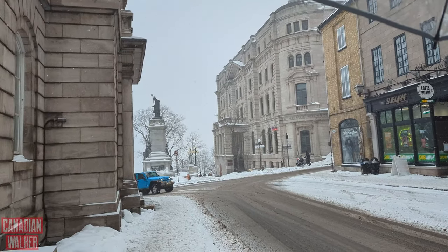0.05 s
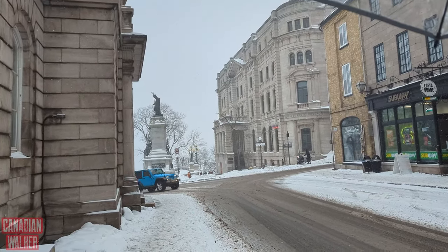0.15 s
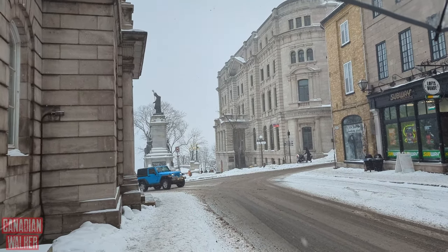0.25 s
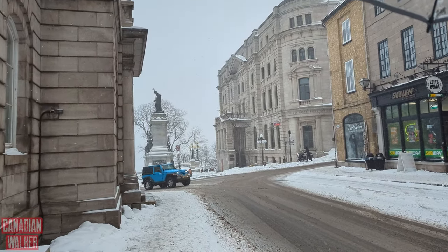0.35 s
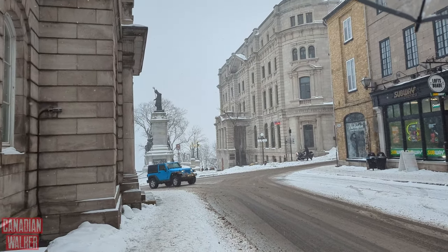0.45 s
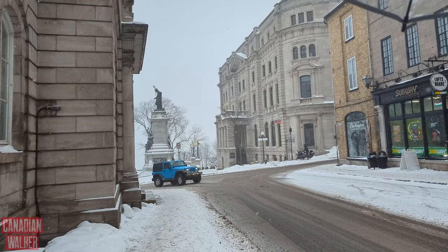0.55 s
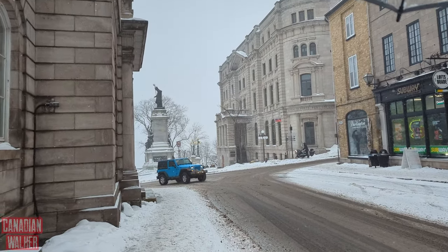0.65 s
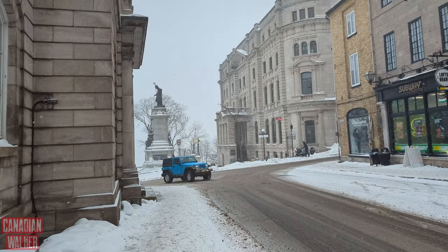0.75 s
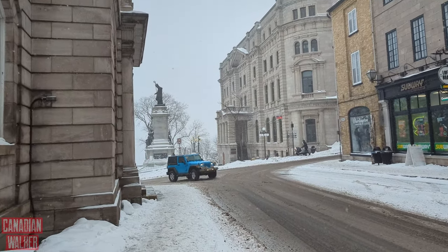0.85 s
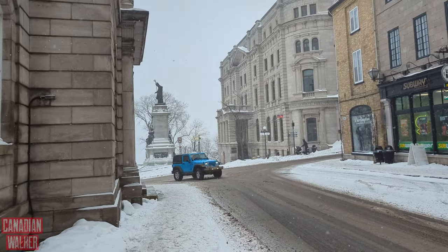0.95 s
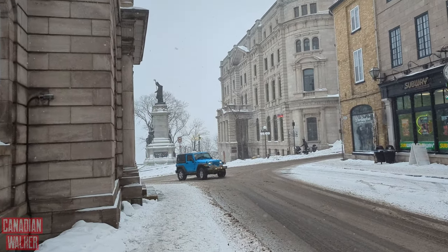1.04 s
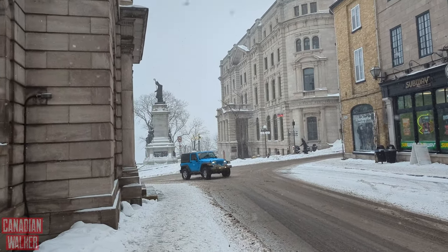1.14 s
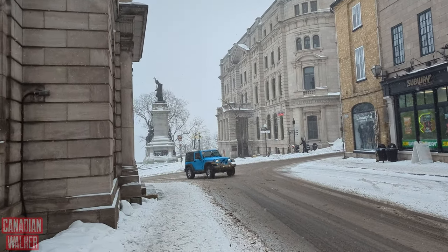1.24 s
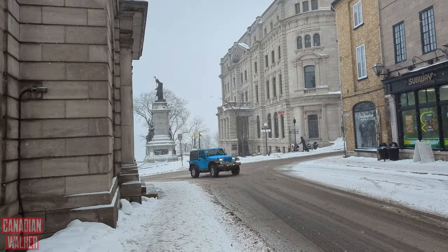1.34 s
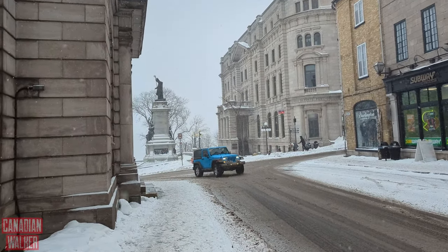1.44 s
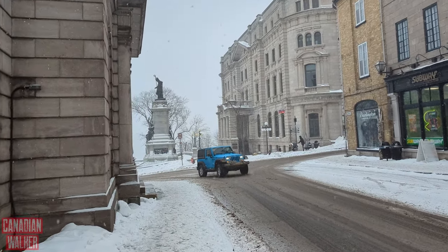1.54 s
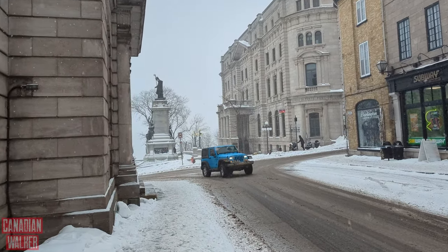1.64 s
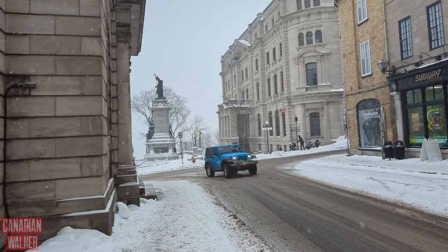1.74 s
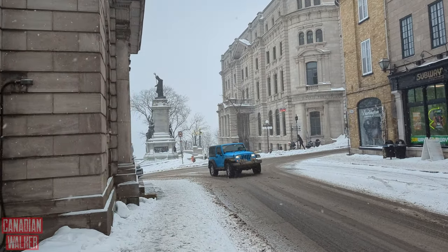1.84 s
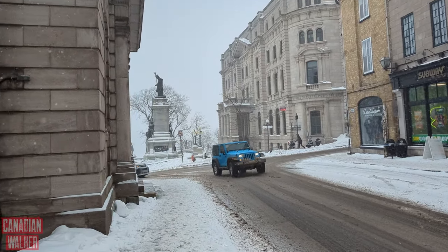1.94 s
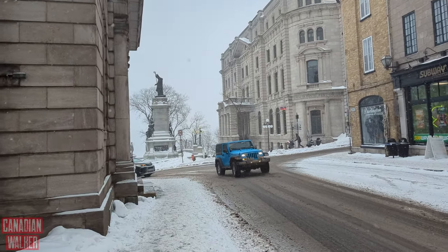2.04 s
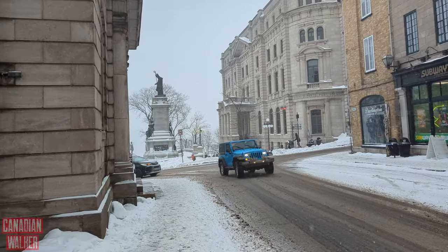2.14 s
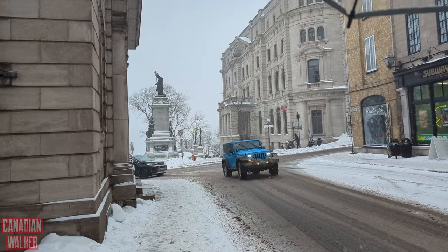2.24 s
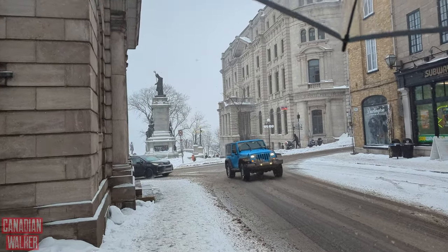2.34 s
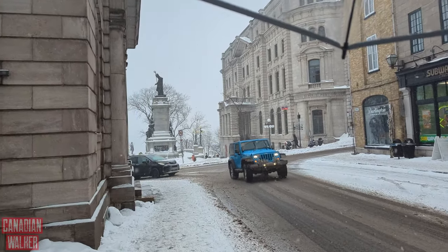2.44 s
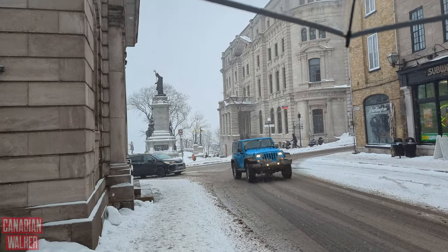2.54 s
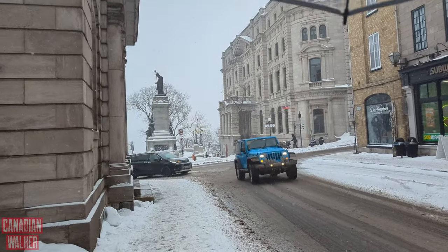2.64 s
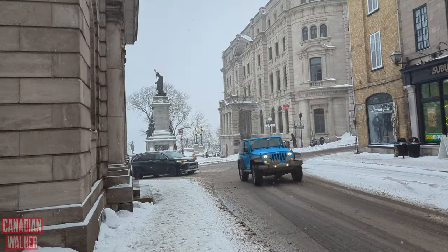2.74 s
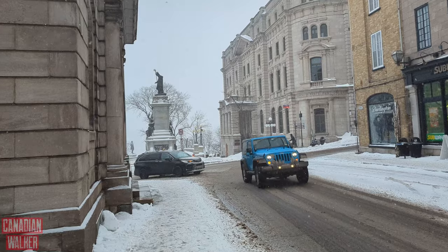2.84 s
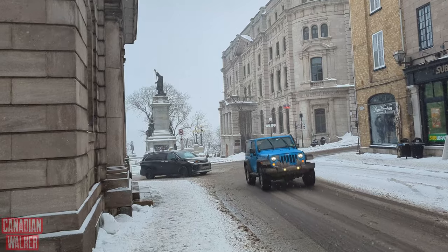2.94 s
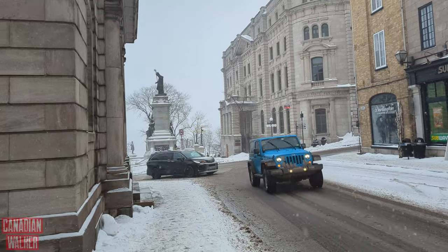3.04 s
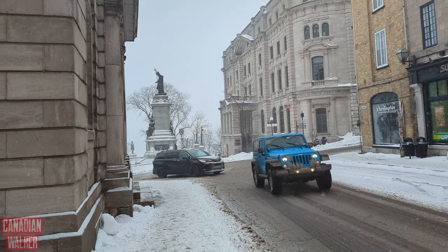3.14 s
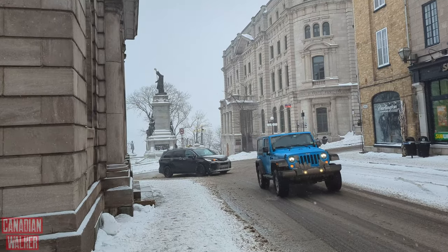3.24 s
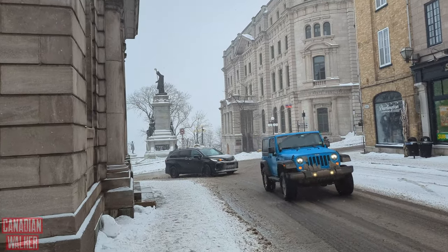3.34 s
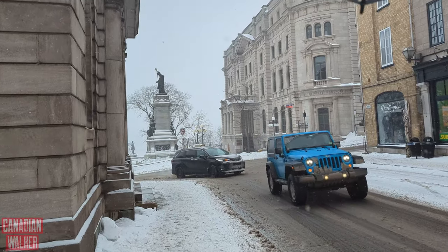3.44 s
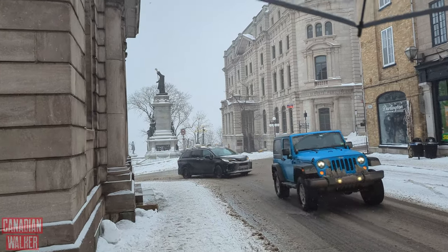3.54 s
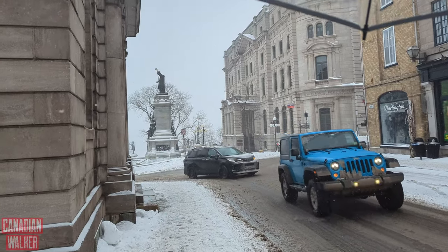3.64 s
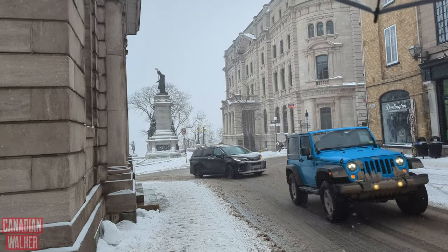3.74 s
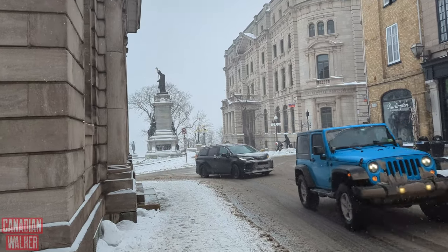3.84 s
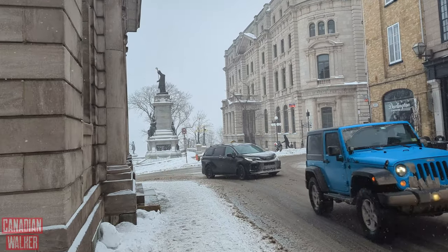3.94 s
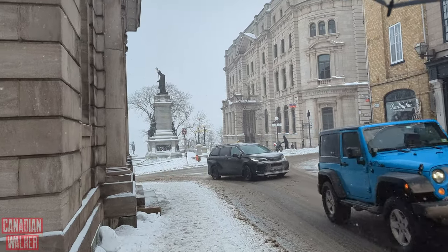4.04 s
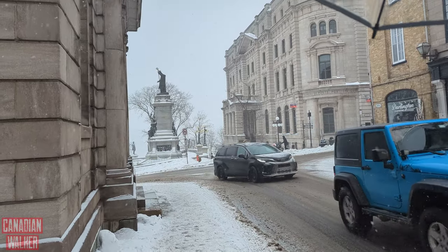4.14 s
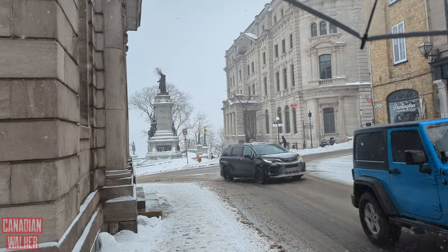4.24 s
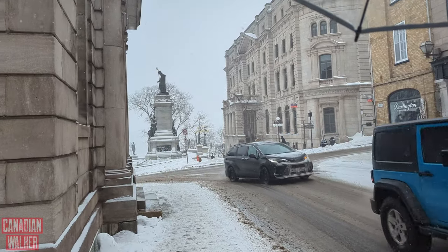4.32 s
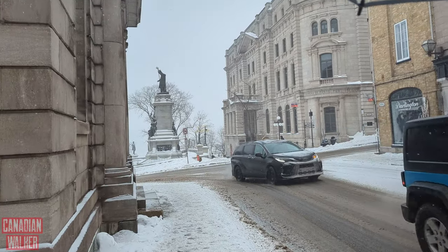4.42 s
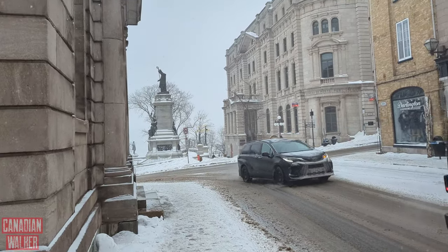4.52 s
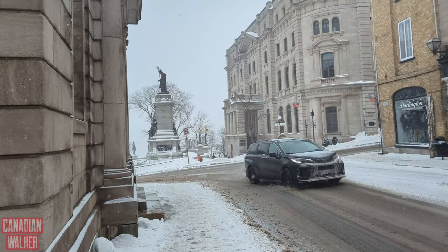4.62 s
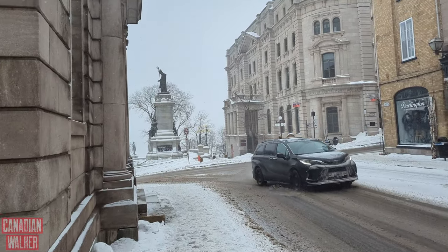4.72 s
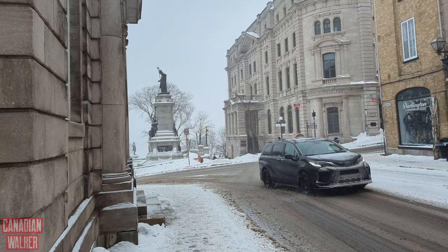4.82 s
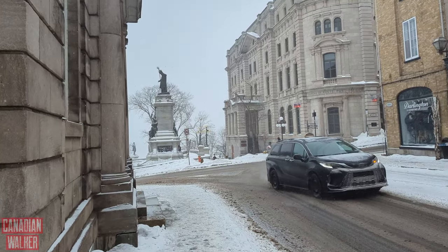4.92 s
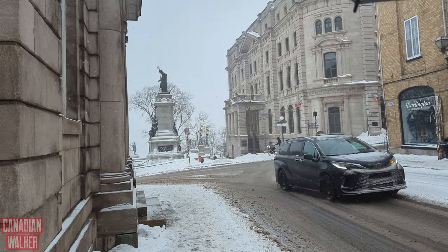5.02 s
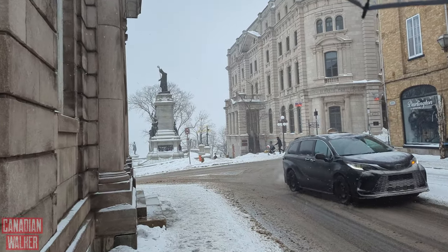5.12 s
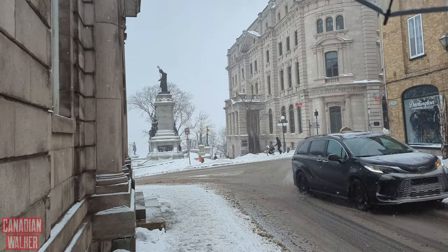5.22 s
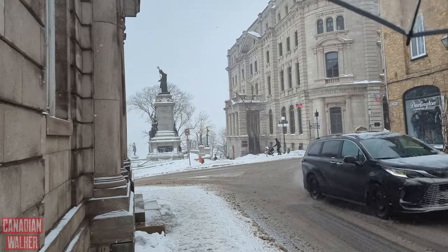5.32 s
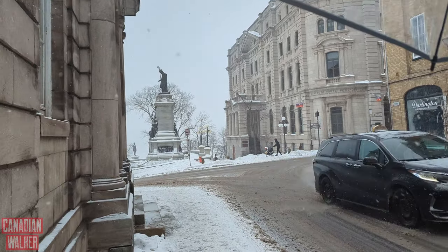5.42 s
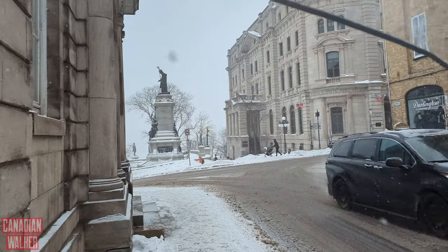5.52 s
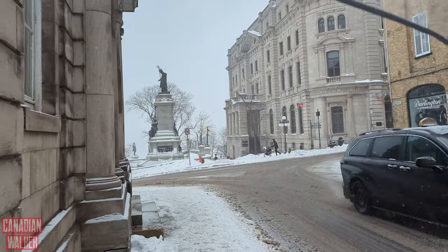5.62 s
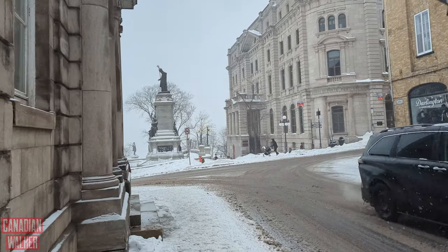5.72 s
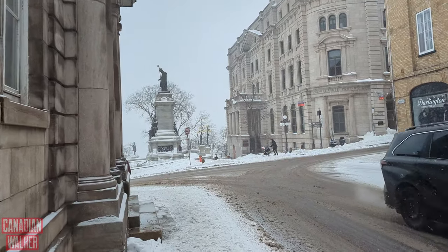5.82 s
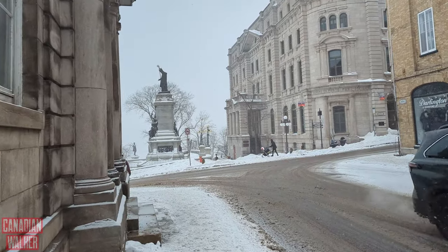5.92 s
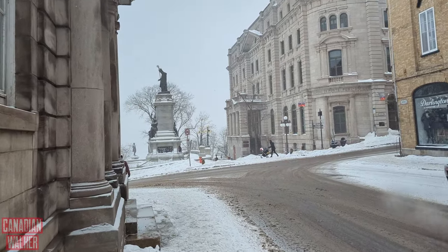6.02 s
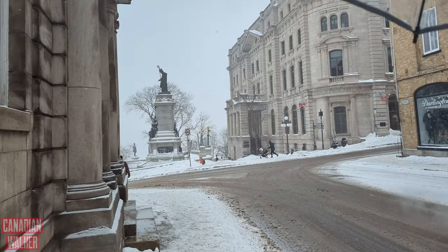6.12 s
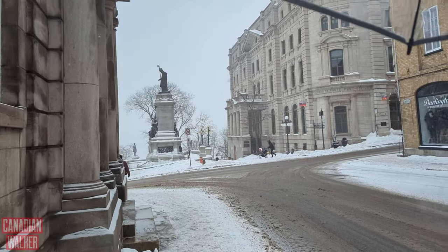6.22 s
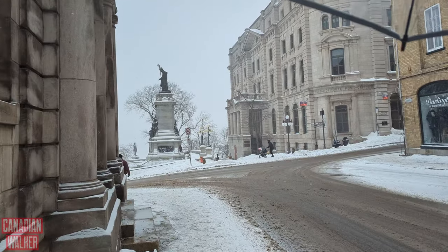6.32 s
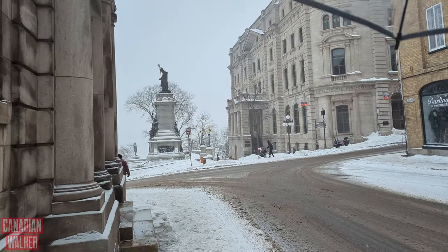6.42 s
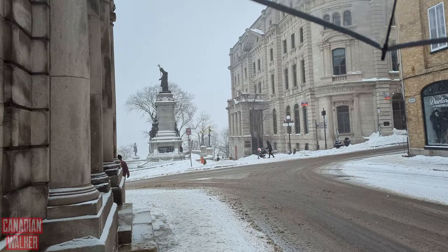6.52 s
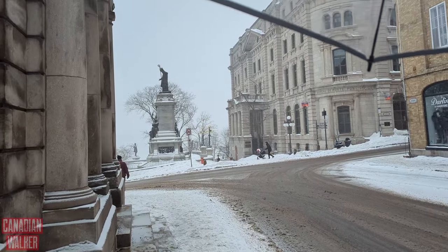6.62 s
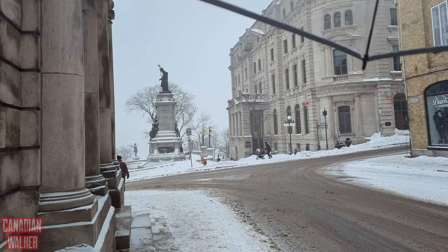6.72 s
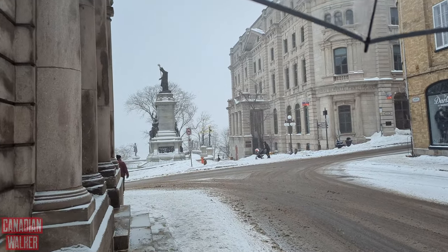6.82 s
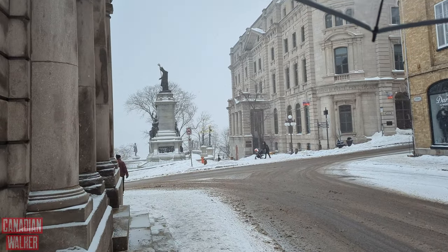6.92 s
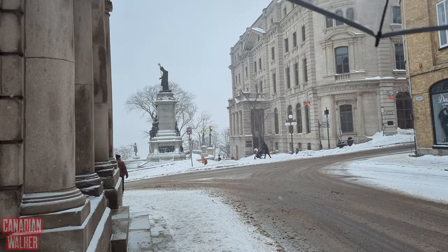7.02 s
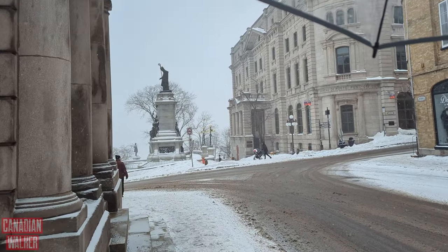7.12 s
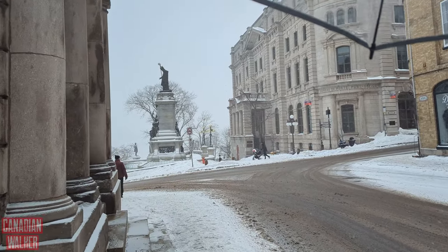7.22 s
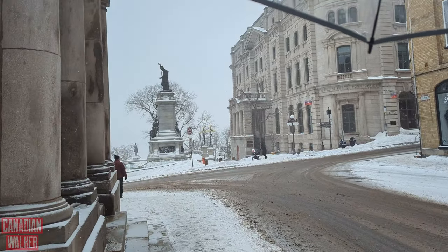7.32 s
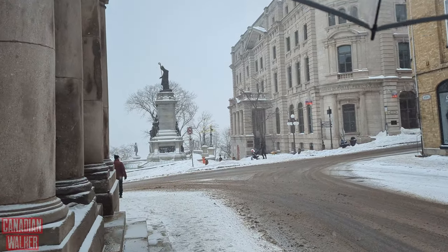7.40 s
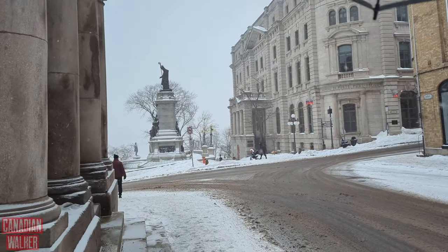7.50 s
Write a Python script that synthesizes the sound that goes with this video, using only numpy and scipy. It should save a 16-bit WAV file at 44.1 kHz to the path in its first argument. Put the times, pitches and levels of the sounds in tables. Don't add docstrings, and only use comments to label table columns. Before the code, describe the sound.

Two cars pass close on a slushy winter street, tyre roar and wet spray swelling then fading, with low wind thumps on the microphone.

```python
import sys
import numpy as np
from scipy import signal
from scipy.fft import rfft, irfft
from scipy.io import wavfile
from scipy.ndimage import uniform_filter1d

SR = 44100
rng = np.random.default_rng(int(sys.argv[2]) if len(sys.argv) > 2 else 0)


def store_wav(level_fs):
    pcm = np.round(np.clip(np.atleast_2d(level_fs), -1, 1) * 32767)
    wavfile.write(sys.argv[1], SR, pcm.T.astype(np.int16))


def field_ratio(decibels):
    return 10 ** (np.asarray(decibels, dtype=float) / 20)


N = 333396
SIZE, HOP = 1024, 256

# (low [Hz], high [Hz])
LAYERS = [
    (550, 1200),
    (1300, 3500),
    (4000, 8500),
    (9000, 15500),
]
# (time [s], left port delay [samples], treble left-right [dB], direct [0-1], wall echo [0-1])
BEARING = [(0, -4, 1, .7, .5), (.9, -3, 1, .8, .3), (1.3, -1, 0, 1, .15), (2.4, 1, 0, 1, .1),
           (3.3, 4, 0, .9, .3), (4, 7, -1, .9, .5), (4.5, 12, -3, .6, .6), (4.85, 19, -2, .6, .2),
           (5.15, 20, -1, .7, .1), (5.25, 4, 1.5, .6, .1), (5.8, 11, -1, .9, .1), (6.1, 18, -2.5, 1, .4),
           (6.5, 21, -2, 1, .4), (6.85, 20, 1, .6, .1), (7.56, 16, 2.5, .4, .1)]
# (frequency [Hz], likeness [0-1])
LIKENESS = [(500, .25), (900, .5), (1300, .6), (2200, .55), (3500, .55), (4500, .25), (9000, .2),
            (15000, .1)]
# (frequency [Hz], level [dB per Hz])
LEFT_PORT = [(330, -44.5), (520, -24.5), (800, -14), (1050, -3.5), (1450, 2), (2600, 1.5), (3900, -2),
             (5200, -6.5), (6500, -7.5), (8500, -6.5), (9900, -11.5), (12500, -9), (14800, -7.5),
             (15700, -10)]
RIGHT_PORT = [(330, -36.5), (520, -24), (800, -14.5), (1050, -4), (1450, 1.5), (3200, 3), (4000, -6),
              (5600, -4), (6400, -6.5), (8900, 0.5), (9900, -1.5), (10900, 2), (12300, -7.5), (15500, -11)]
# (frequency [Hz], phase [rad])
BODY_TWIST = [(700, 0), (1400, -.35), (2400, 0), (3500, .6), (5000, 0)]
WALL_LAG = -21.5


def cars():
    spectra = [slush(per_s=2500, spread_db=2.8, share=.24) for _ in range(4)]
    hz, t, direct = spectra[0]
    wall, street_l, street_r = (z for _, _, z in spectra[1:])

    lag, pan_db, near, echo = follow(BEARING, t)
    like = read(LIKENESS, hz)[:, None]
    near = like * np.clip(near, 0, 1)
    echo = like * np.clip(echo, 0, 1)
    rest = np.sqrt(np.clip(1 - near - echo, 0, 1))

    def late(samples):
        return np.exp(-2j * np.pi * hz[:, None] * samples / SR)

    twist = np.exp(1j * read(BODY_TWIST, hz))[:, None]
    left = np.sqrt(near) * direct * late(lag) * twist
    left = left + np.sqrt(echo) * wall * late(WALL_LAG) + rest * street_l
    right = np.sqrt(near) * direct + np.sqrt(echo) * wall + rest * street_r

    ports_db = np.array([read(LEFT_PORT, hz), read(RIGHT_PORT, hz)])
    level_db = car_level_db(hz, t, ports_db)
    treble = np.clip(hz / 9000, 0, 1)[:, None]
    patches_db = 0.71 * drift((len(t), len(hz)), 9, 6).T + ridges_db(hz, t)
    patches_db = patches_db + 1.05 * drift((len(t), len(hz), 2), 40, 3).T
    filter_db = wind_filter_db(hz, t)
    splash_db = 0.66 * treble * drift(len(t), 3) + 0.3 * drift(len(t), 3)
    shade_db = treble * pan_db / 2
    z = np.array([left * field_ratio(shade_db), right / field_ratio(shade_db)])
    z = z * field_ratio(ports_db[..., None] + level_db + patches_db + splash_db + filter_db)
    return signal.istft(z, SR, nperseg=SIZE, noverlap=SIZE - HOP)[1][:, :N]


def slush(per_s, spread_db, share):
    size = field_ratio(spread_db * np.minimum(rng.exponential(1, N), 4)) * rng.choice([-1., 1.], N)
    drops = evened(size * (rng.random(N) < per_s / SR))
    contact = rng.standard_normal(N)
    hz, t, z = signal.stft(np.array([contact, drops]), SR, nperseg=SIZE, noverlap=SIZE - HOP)
    wet = np.clip(share * (hz / 10000) ** 0.5, 0, 1)[:, None]
    return hz, t, np.sqrt(1 - wet) * z[0] + np.sqrt(wet) * z[1]


def car_level_db(hz, t, ports_db):
    step = 2 / SIZE
    base_db = []
    for lo, hi in LAYERS:
        inside = (hz > lo) & (hz < hi)
        power = step * (field_ratio(ports_db[:, inside]) ** 2).sum(1)
        base_db.append(np.mean(10 * np.log10(power)))
    centres = np.log(np.mean(LAYERS, 1))
    blend = np.array([np.interp(np.log(hz + 1), centres, row) for row in np.eye(len(LAYERS))])
    return blend.T @ (layers_db(t) - np.array(base_db)[:, None])


# (time [s], tyre level [dB], spray thrown above it [dB])
CARS = [(0.0, -39.5, -10.5), (0.55, -44.5, -7), (1.01, -40, -11.5), (1.24, -38.5, -11), (3.37, -28, -5.5),
        (3.51, -27, -4.5), (3.98, -26.5, 0.5), (4.74, -24, 2.5), (4.84, -27.5, 3.5), (5.01, -25.5, 3),
        (5.45, -25, -3.5), (5.66, -27, -2), (6.08, -23.5, -3.5), (6.36, -25, -1), (6.63, -25, -3),
        (6.89, -30, -2.5), (6.93, -28.5, -6), (7.56, -34.5, -6)]
# (level over the tyres [dB], share of the thrown spray, gain once a tailpipe faces the ports [dB])
LAYER_LAW = [
    (-12, 0.12, 5),
    (2.5, 0.15, -0.5),
    (0.67, 0.98, -0.5),
    (-3, 1.26, 0.6),
]


def layers_db(t):
    level_db, spray_db = follow(CARS, t)
    tail_s, turn_s = 4.28, .6
    behind = (1 + np.tanh((t - tail_s) / turn_s)) / 2
    return np.array([level_db + db + share * spray_db + tail_db * behind for db, share, tail_db in LAYER_LAW])


# (start [s], end [s], centre [Hz], width [Hz], level [dB])
RIDGES = [(6, 7.15, 1370, 210, 4.5), (2.5, 4, 1220, 260, -4.5), (5.7, 6.5, 3500, 1100, -2),
          (0.4, 1.55, 1800, 790, 3), (4, 5.05, 646, 110, 9), (0.8, 2.44, 730, 160, 10),
          (5, 5.05, 1460, 580, -2.5), (2.5, 2.9, 2900, 1500, -1.5), (-0.3, 1.33, 645, 210, 8),
          (-3.5, 2.48, 3150, 720, 2), (0, 0.52, 640, 300, 2.5), (2.1, 3.05, 1160, 320, 4),
          (0.9, 1.9, 840, 480, -5), (4, 4.6, 1070, 430, 3), (1.5, 4.5, 1500, 180, 3.5),
          (-0.2, 3.4, 1400, 210, 2), (2.2, 2.43, 2960, 210, 5), (2.5, 3.95, 910, 110, 6),
          (-0.5, 1.15, 1500, 470, -6), (6.5, 6.35, 2260, 300, 3.5), (6.5, 6.75, 1980, 420, 4),
          (4.8, 5.7, 2350, 820, 3)]


def ridges_db(hz, t):
    def fade(s):
        return np.clip(s / 0.037 + .5, 0, 1)

    total = 0
    for start, end, centre, width, db in RIDGES:
        bump = np.exp(-(2 * (hz[:, None] - centre) / width) ** 2)
        total = total + db * bump * fade(t - start) * fade(end - t)
    return total


def wind_filter_db(hz, t):
    bass = np.clip((1300 - hz) / 700, 0, 1)[:, None]
    nibble_db = 5.6 * bass * drift((len(t), len(hz), 2), 16, 2).T
    open_db = opening_db(t)
    dips_db = open_db - uniform_filter1d(open_db, 200, axis=1)
    lows = np.clip((850 - hz) / 150, 0, 1)[:, None]
    return nibble_db + 0.27 * lows * np.minimum(dips_db, 0)[:, None]


def gusts():
    out, size = np.zeros((2, N + SR)), 2 ** 15
    hz, lead = np.fft.rfftfreq(size, 1 / SR), SR // 20
    for port, width, s, length, lo_hz, db in buffet_rows():
        n, start = round(length * SR), round(s * SR) - lead
        passes = 1 / (1 + (lo_hz / (hz + 1)) ** 12) / (1 + (hz / (lo_hz + width)) ** 14)
        wobble = signal.hilbert(irfft(rfft(rng.standard_normal(size)) * passes, size))
        wobble = (wobble / abs(wobble) ** 0.1).real
        switch = signal.windows.tukey(n, min(0.036 / length, 1))
        wobble *= np.pad(switch, (lead, size - n - lead))
        wobble *= field_ratio(-90 * (length < .1) * (np.arange(size) - lead) / SR)
        band = irfft(rfft(wobble) * passes, size)
        band *= field_ratio(db) * np.sqrt(n) / np.linalg.norm(band)
        out[port, max(start, 0):start + size] += band[max(-start, 0):]
    return out[:, :N]


# (time [s], length [s], low edge [Hz], level [dB])
LEFT_GUSTS = [(0.846, 0.056, 365, -49.5), (1.286, 0.23, 410, -55), (1.76, 0.21, 370, -55.5),
              (2.709, 0.1, 8.3, -40), (2.793, 0.15, 35, -51), (3.46, .11, 218, -32.5),
              (3.457, 0.1, 410, -39.5), (3.458, .17, 527, -43), (3.564, 0.1, 220, -53.5),
              (4.855, 0.19, 480, -52), (5.334, .29, 25, -55.5)]
# (time [s], length [s], level [dB])
THUDS = [(0.152, 0.16, -32), (0.962, 0.065, -41.5), (1.467, 0.088, -38), (2.404, .12, -35),
         (2.811, .14, -55), (5.773, 0.066, -35), (6.836, 0.053, -45), (.642, 0.11, -55),
         (4.728, 0.026, -52), (7.166, .08, -55)]
# (time [s], length [s], low edge [Hz], level [dB])
KNOCKS = [(.095, 0.072, 120, -48), (3.78, .06, 121, -50), (.356, 0.068, 136, -29.5),
          (1.099, 0.054, 80, -42), (2.168, 0.043, 90, -37.5), (2.198, 0.043, 218, -49),
          (2.688, .05, 278, -35), (3.113, 0.08, 218, -48.5), (3.224, .04, 216, -47),
          (3.316, 0.077, 201, -49), (3.9, 0.062, 87, -33), (4.535, 0.065, 66.4, -46.5),
          (4.688, .06, 335, -46), (6.615, .051, 350, -32), (6.882, 0.096, 622, -37.5),
          (7.093, .052, 157, -28.5), (7.325, .06, 84.5, -35.5)]
# (time [s], length [s], low edge [Hz], level [dB])
BUFFETS = [(.198, .11, 130, -42), (0.442, 0.12, 304, -48), (0.977, 0.18, 188, -50.5),
           (1.465, 0.25, 183, -43.5), (2.51, .13, 162, -40.5), (3.113, .11, 375, -45.5),
           (3.885, .18, 344, -46.5), (4.321, 0.12, 330, -45), (6.567, 0.2, 365, -41),
           (6.888, 0.2, 143, -33)]
# (time [s], length [s], low edge [Hz], level [dB])
SLAPS = [(0.359, 0.08, 210, -36.5), (1.304, .07, 55, -51), (2.426, 0.053, 288, -45.7),
         (2.546, 0.074, 268, -48.5), (2.811, .06, 188, -37.5), (5.79, 0.064, 285, -39.2),
         (5.82, 0.095, 520, -37), (5.85, .06, 61.6, -48), (6.023, 0.054, 70, -51), (6.751, 0.18, 284, -38),
         (7.082, 0.068, 247, -39), (7.359, 0.203, 178, -41)]
# (time [s], length [s], low edge [Hz], level [dB])
MOANS = [(4.145, .16, 265, -59), (3.689, 0.34, 233, -41), (4.31, 0.12, 274, -40), (4.428, 0.23, 264, -36),
         (4.623, 0.111, 262, -34), (6.633, 0.25, 271, -41)]


def buffet_rows():
    band_hz, broad_hz, narrow_hz = 99, 232, 44.8
    thud_hz = 29.6
    thuds = [(s, length, thud_hz, db) for s, length, db in THUDS]
    kinds = [(0, band_hz, LEFT_GUSTS),
             (1, band_hz, thuds + KNOCKS + BUFFETS),
             (1, broad_hz, SLAPS),
             (1, narrow_hz, MOANS)]
    return [(port, width, *row) for port, width, rows in kinds for row in rows]


# (frequency [Hz], level [dB per Hz])
WASH_COLOUR = [(15, -20), (40, 1), (80, 10), (130, 4.5), (300, 14.5), (480, 10.5), (700, 13.5), (900, -2.5)]
RUMBLE_DB = [
    [-75],
    [-70.5],
]


def wash():
    lumps_db = 5.1 * drift((N, 2), 900).T
    low = coloured(WASH_COLOUR, 2) * field_ratio(opening_db(np.arange(N) / SR) + lumps_db - 10.5)
    rumble = coloured([(15, -26), (45, 7.0), (90, 3), (160, -4), (300, -60)], 2)
    rumble = rumble * field_ratio(7.6 * drift((N, 2), 1800).T)
    return low + field_ratio(np.array(RUMBLE_DB)) * rumble


# (time [s], level [dB])
OPEN_LEFT = [(.78, -45), (1.44, -55), (1.92, -37), (2.9, -41), (3.51, -29), (4.2, -54), (4.96, -27.5),
             (5.22, -38), (5.72, -48), (6.09, -43), (6.68, -53)]
OPEN_RIGHT = [(.1, -39), (.42, -39), (.66, -48), (1.04, -36.5), (1.25, -38.5), (1.48, -42), (2.2, -40),
              (2.66, -31.5), (3.12, -44), (3.38, -40), (3.9, -27.5), (4.3, -40), (4.74, -28.5), (5.13, -43),
              (5.36, -44), (5.76, -45), (6.68, -33), (7.0, -27.5), (7.35, -32)]
CLOSE_DB_PER_S = [120, 83]
SHUT_DB = [-83, -55]


def opening_db(t):
    ports = []
    for opens, rate, shut in zip((OPEN_LEFT, OPEN_RIGHT), CLOSE_DB_PER_S, SHUT_DB):
        peaks = [db - rate * abs(t - s) for s, db in opens]
        ports.append(np.maximum(np.max(peaks, 0), shut))
    return np.array(ports)


def evened(x):
    return x / np.sqrt(np.mean(x ** 2) + 1e-20)


def read(points, hz):
    f, value = np.transpose(points)
    return np.interp(np.log(hz + 1), np.log(f + 1), value)


def follow(table, t):
    s, *columns = np.transpose(table)
    return np.array([np.interp(t, s, c) for c in columns])


def drift(shape, *spans):
    x = rng.standard_normal(shape)
    for axis, span in enumerate(spans):
        x = uniform_filter1d(uniform_filter1d(x, span, axis), span, axis)
    return evened(x)


def coloured(points, rows):
    hz = np.fft.rfftfreq(N, 1 / SR)
    return evened(irfft(rfft(rng.standard_normal((rows, N))) * field_ratio(read(points, hz)), N))


def scene():
    return cars() + wash() + gusts()


def top_cut(x):
    return signal.sosfilt(signal.butter(12, 15830, fs=SR, output="sos"), x)


def record(dry):
    edge = signal.firwin(511, 15730, window=("kaiser", 9), fs=SR)
    mix = signal.oaconvolve(dry, edge[None], "same")
    return top_cut(mix)


dry = scene()
out = record(dry)
store_wav(out)
```